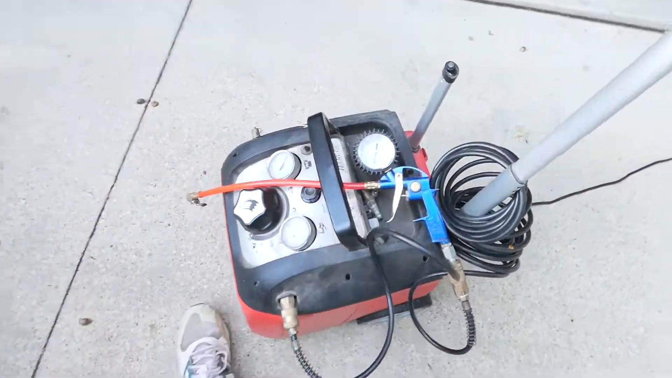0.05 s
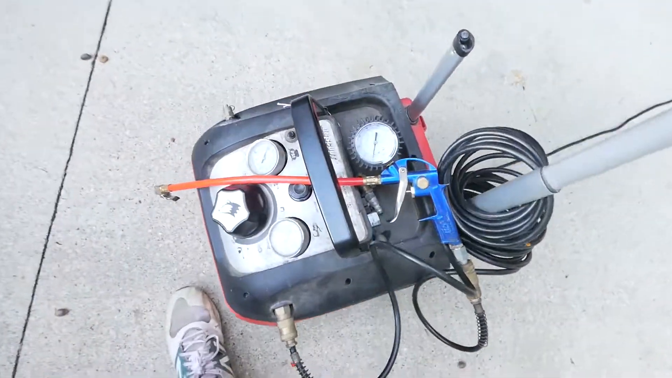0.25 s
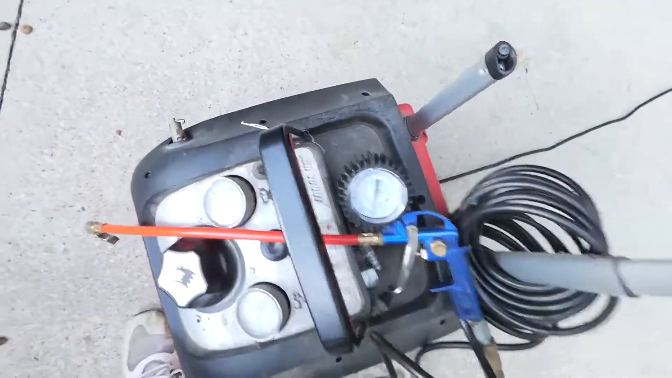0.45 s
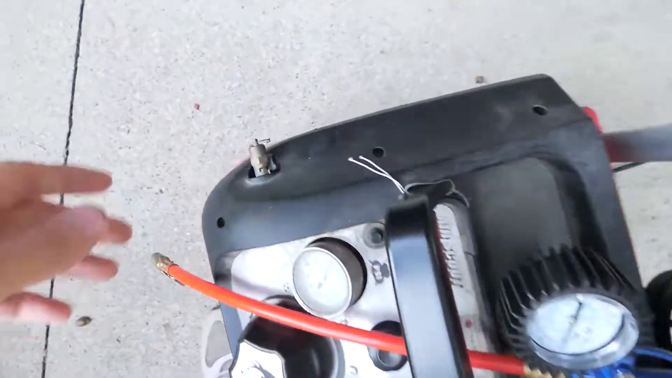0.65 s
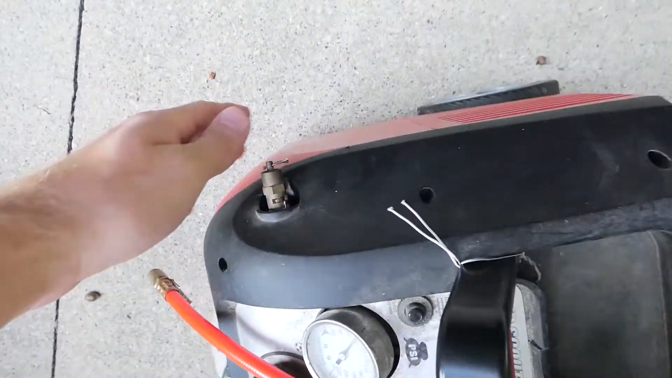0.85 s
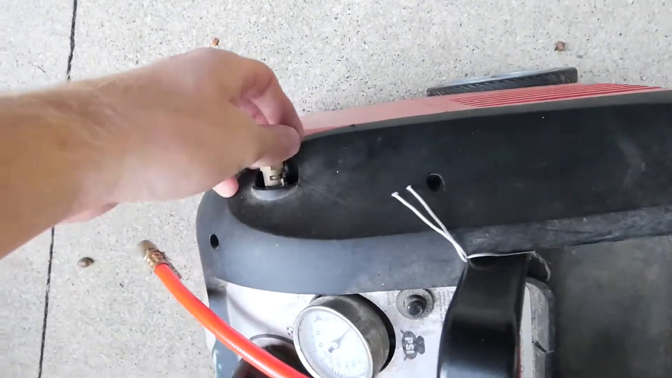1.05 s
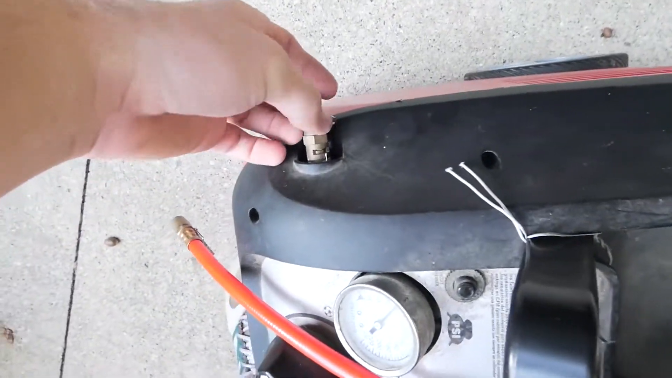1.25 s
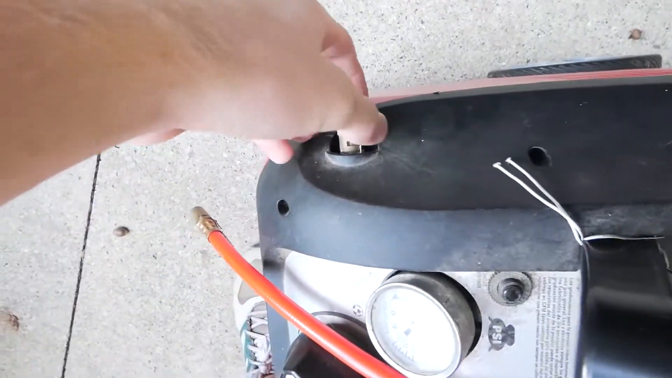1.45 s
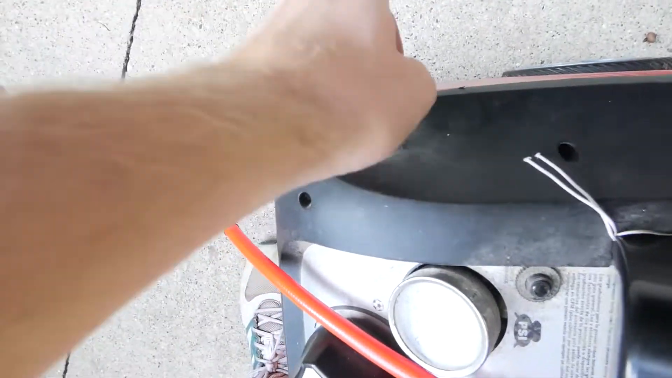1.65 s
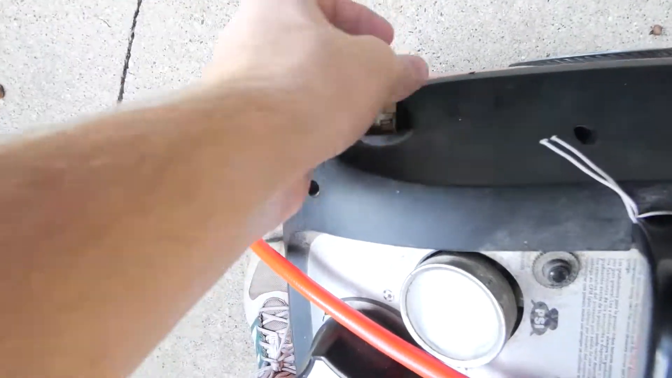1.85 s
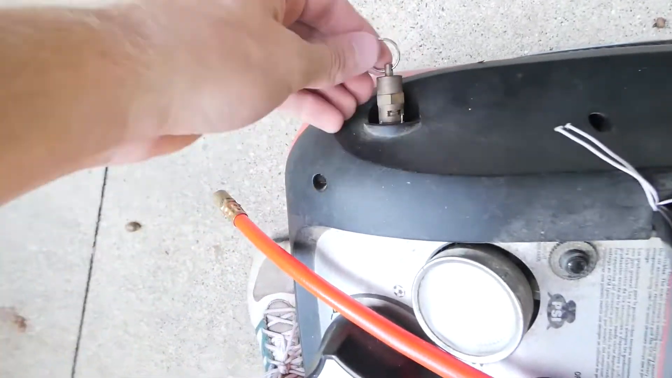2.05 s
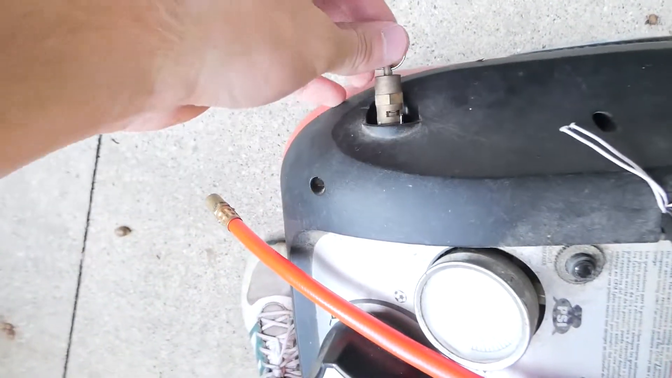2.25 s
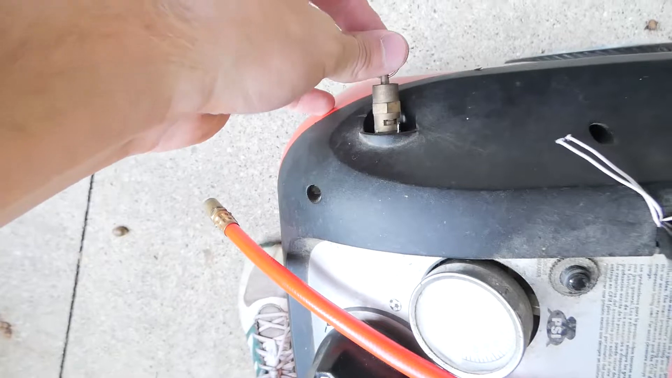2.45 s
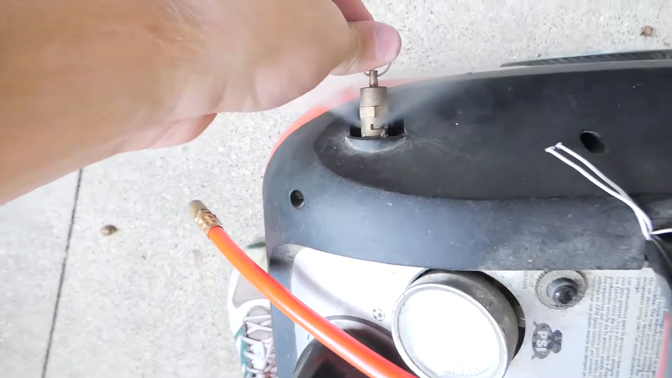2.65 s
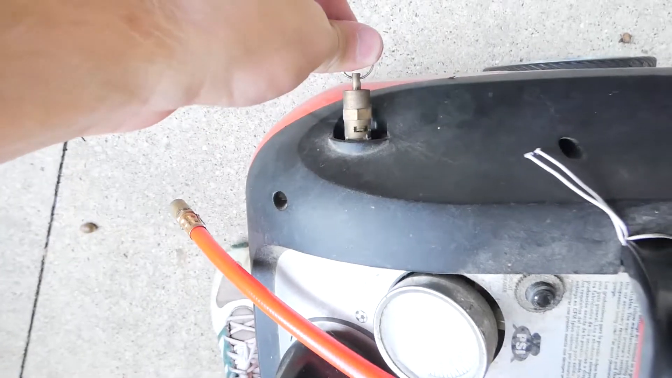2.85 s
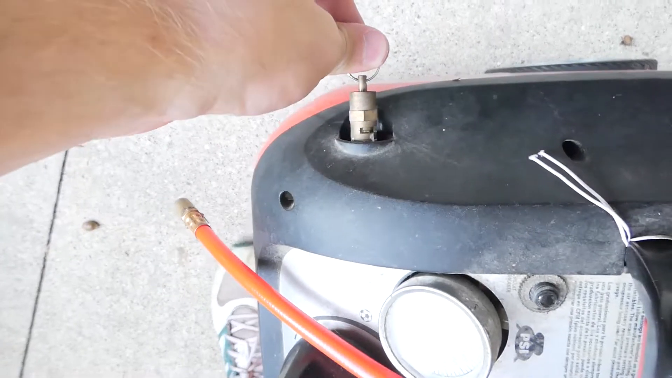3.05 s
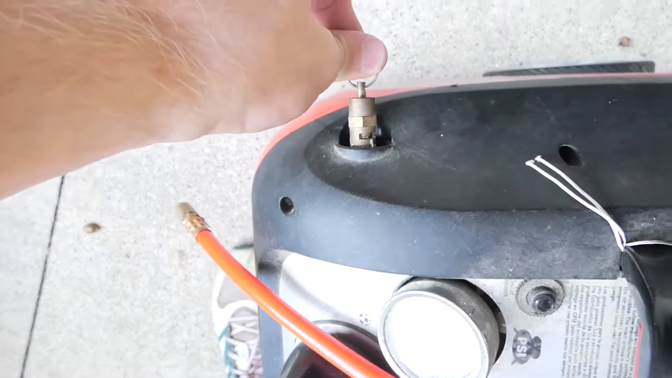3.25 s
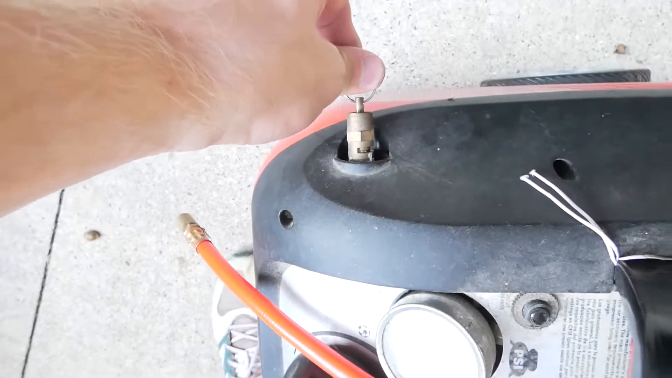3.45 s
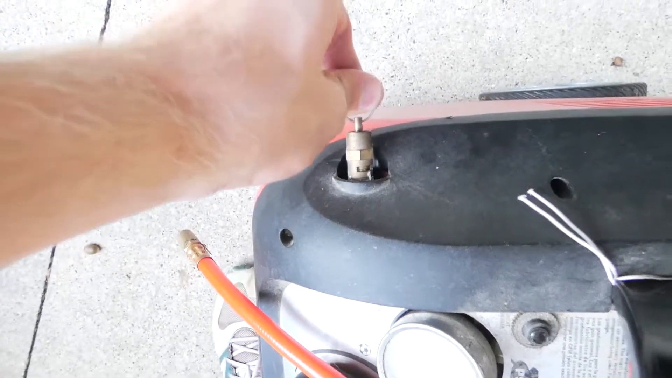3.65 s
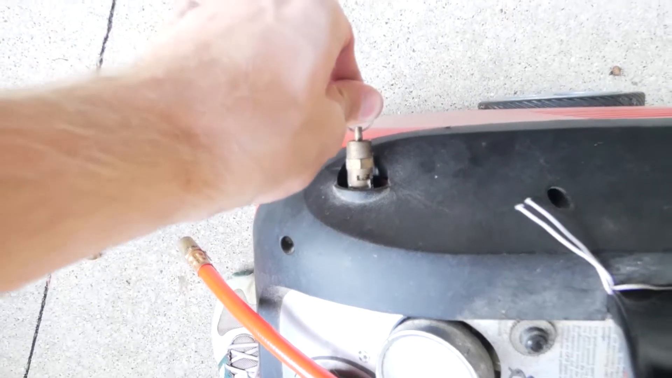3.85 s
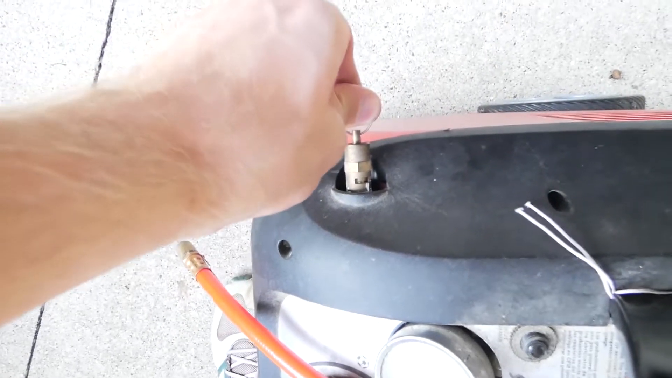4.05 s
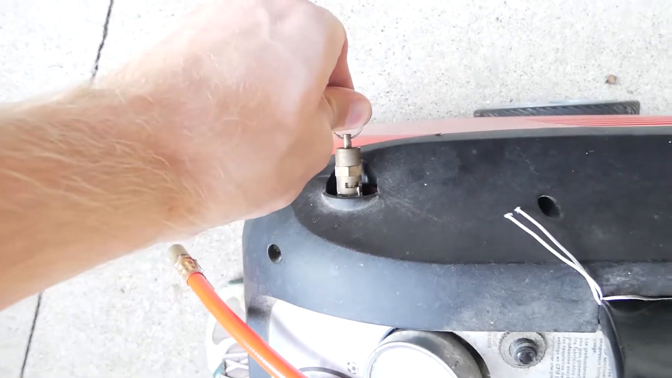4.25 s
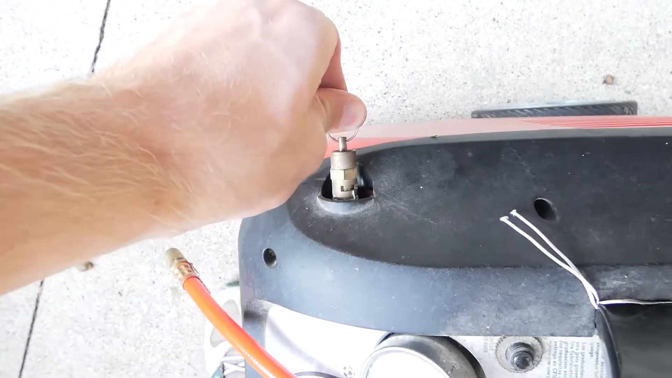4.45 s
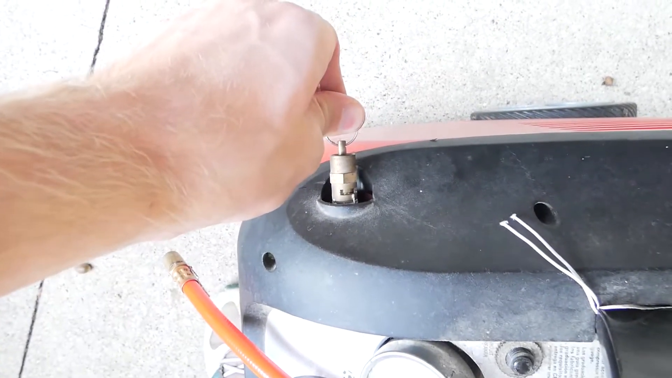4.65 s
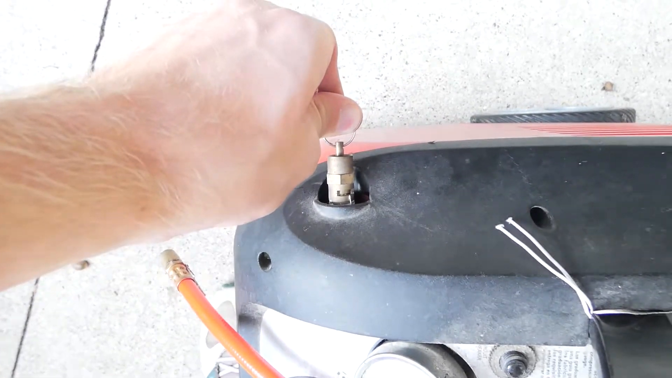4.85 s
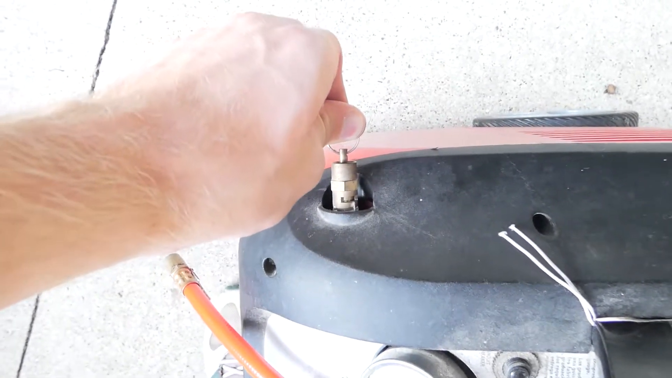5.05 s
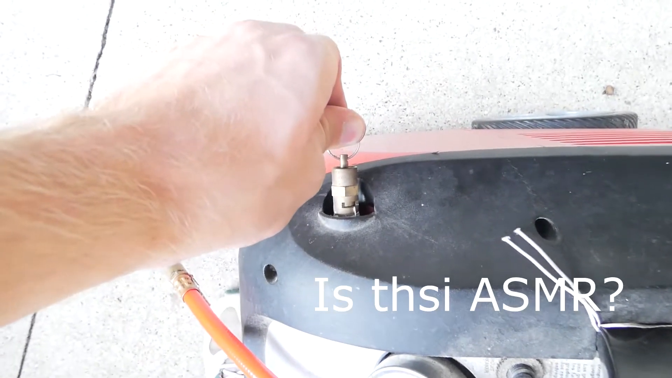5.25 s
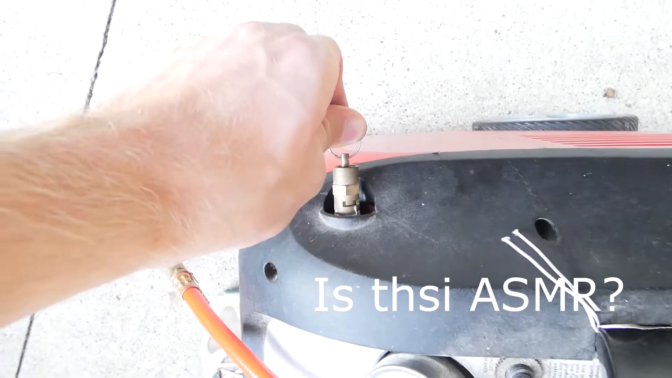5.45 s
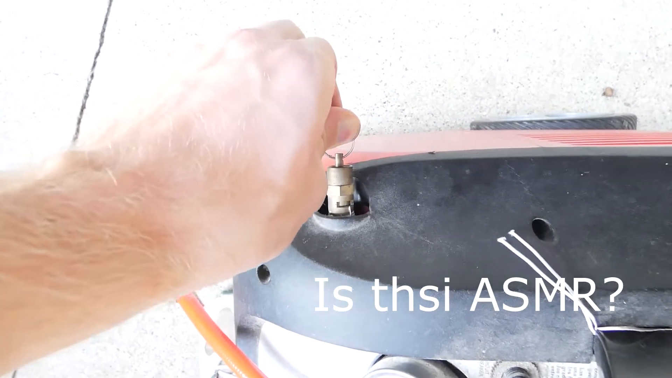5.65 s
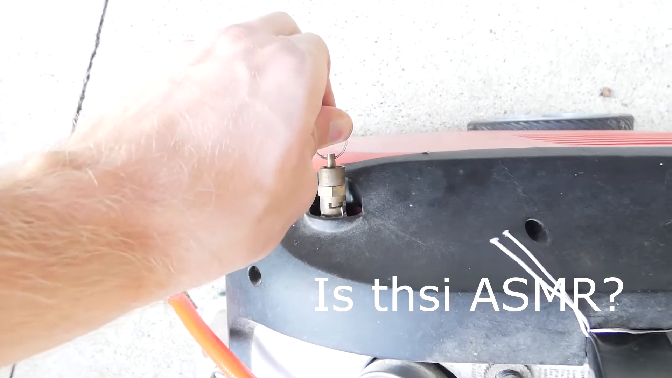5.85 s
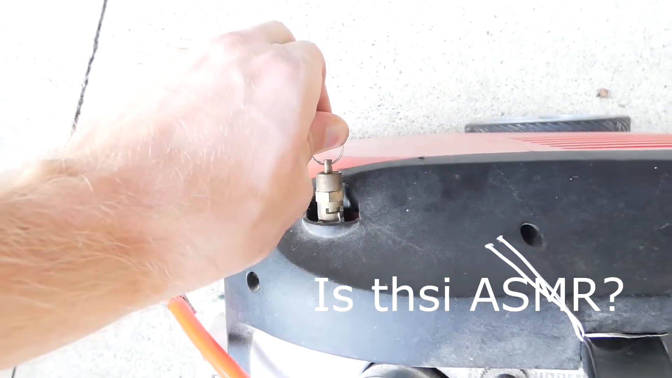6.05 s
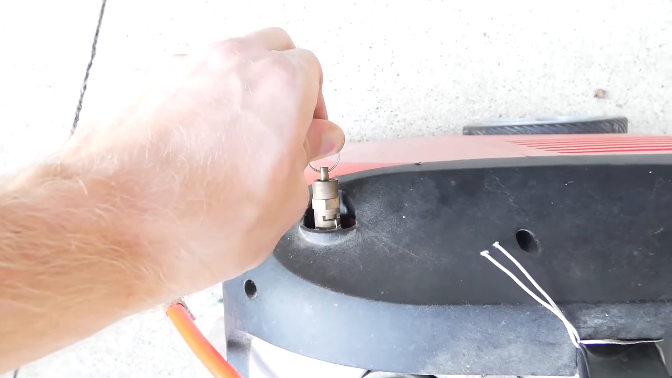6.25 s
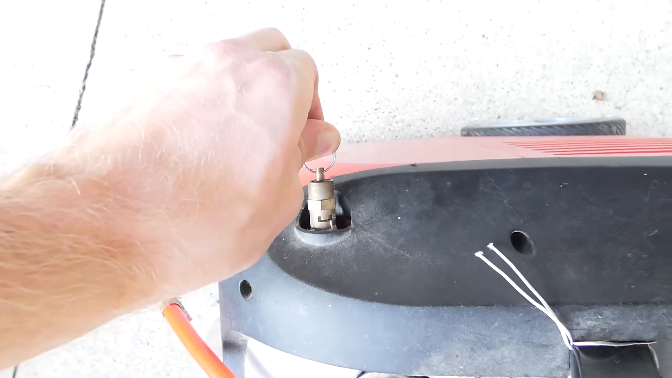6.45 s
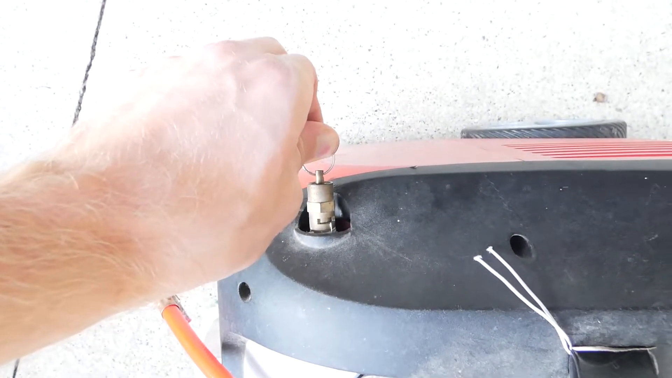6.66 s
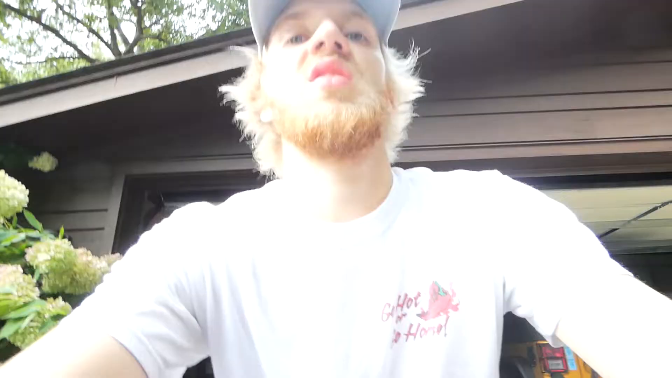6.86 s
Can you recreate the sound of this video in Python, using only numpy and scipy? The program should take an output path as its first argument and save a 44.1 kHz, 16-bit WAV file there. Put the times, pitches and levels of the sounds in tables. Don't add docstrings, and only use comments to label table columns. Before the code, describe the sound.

Hands clatter on a hollow plastic shell outdoors, a valve snaps open, and pressurised air rushes out in a long, gradually weakening hiss.

```python
import sys
import numpy as np
from scipy import signal
from scipy.fft import rfft, irfft
from scipy.io import wavfile

SR = 44100
rng = np.random.default_rng(int(sys.argv[2]) if len(sys.argv) > 2 else 0)


def boost_factor(decibels):
    exponent = np.asarray(decibels, float) / 20
    return 10 ** exponent


def generate_wav(sig):
    pcm = np.round(np.clip(np.atleast_2d(sig).T, -1, 1) * 32767).astype(np.int16)
    wavfile.write(sys.argv[1], SR, pcm)


N = 304731
POP_S = 2.5524

# (time [s], left minus right [dB])
HAND_PAN = [(0, 8), (.25, 12), (.45, 4.6), (1.0, .3), (1.5, -4.2), (2.0, -1.3), (2.5, -3.3)]


def rms_one(x):
    return x / np.sqrt(np.mean(x ** 2) + 1e-20)


def in_time(rows):
    s, *columns = np.transpose(rows)
    return [np.interp(np.arange(N) / SR, s, c) for c in columns]


def at_hz(points):
    hz = np.maximum(np.arange(N // 2 + 1) * SR / N, 1)
    table_hz, value = np.transpose(points)
    return np.interp(np.log(hz), np.log(table_hz), value)


def drift(rate_hz):
    r = np.exp(-80 * np.pi * rate_hz / SR)
    white = rng.standard_normal(N // 40 + 2002)
    slow = signal.lfilter([1], [1, -2 * r, r * r], white)[2000:]
    return np.interp(np.arange(N) / 40, np.arange(len(slow)), rms_one(slow))


def panned(x, pan_db):
    return x * boost_factor(np.array([pan_db / 2, -pan_db / 2]))


def stereo_white(alike, pan):
    mid, side = rfft(rng.standard_normal((2, N)))
    c = np.clip(at_hz(alike), 0, 1)
    return panned(np.sqrt(1 + c) * mid + np.sqrt(1 - c) * side * [[1], [-1]], at_hz(pan))


def coloured(white, colour):
    return rms_one(irfft(white * boost_factor(at_hz(colour)), N))


def resonance(x, hz, width_hz):
    r = np.exp(-np.pi * width_hz / SR)
    zeros = np.array([1, 0, -1]) * (1 - r * r) / 2
    return signal.lfilter(zeros, [1, -2 * r * np.cos(2 * np.pi * hz / SR), r * r], x)


def body(x, modes):
    return sum((-1) ** k * boost_factor(db) * resonance(x, hz, width) for k, (hz, width, db) in enumerate(modes))


def crackle(count, per_s):
    born = rng.random(count) < per_s / SR
    size = rng.exponential(1, count)
    sign = rng.choice([-1, 1], count)
    return rms_one(born * boost_factor(3.0 * np.minimum(size, 4)) * sign)


def scuffs(rows, width):
    out = np.zeros((2, N + SR))
    t = np.arange(-(SR // 10), SR // 5) / SR
    for s, db, hz, length_s in rows:
        slips = crackle(len(t), 5000) + 0.36 * rng.standard_normal((2, len(t)))
        swell = np.exp(-(t / np.where(t < 0, 0.22 * length_s, 0.37 * length_s)) ** 2)
        tone = resonance(resonance(slips, hz, width * hz), hz, width * hz)
        i = round(s * SR)
        out[:, i:i + len(t)] += boost_factor(db) * rms_one(swell * tone) * np.sqrt(np.mean(swell ** 2))
    return panned(out[:, SR // 10:][:, :N], in_time(HAND_PAN)[0])


def yard():
    # (frequency [Hz], density [dB per Hz])
    low_colour = [(30, -14.5), (190, -2.5), (500, -13.5), (1200, -13.5), (1800, -18), (2450, -8.5),
                  (3200, -21), (4100, -24), (4800, -19.5), (6300, -21), (7700, -26), (9000, -22.5),
                  (12500, -30), (15800, -37)]
    high_colour = [(30, -20), (200, -9), (500, -24), (1100, -15.5), (1800, -15), (2550, -9.5), (3300, -21),
                   (4300, -16), (5600, -26), (6700, -12), (7700, -29), (9800, -15.5), (11500, -21),
                   (15800, -26)]
    # (frequency [Hz], left-right likeness [0-1])
    alike = [(60, 0.9), (240, 0.47), (950, 0.61), (3770, 0.97), (15000, 0.48)]
    # (frequency [Hz], left minus right [dB])
    pan = [(60, 21.5), (180, 0.5), (550, 3.5), (1650, -10.5), (4970, -4.5), (15000, 1)]
    # (centre [Hz], width [Hz], level [dB])
    whine_modes = [(2535, 125, 0), (2400, 300, -7)]
    # (frequency [Hz], wavering [Hz], level [dB rms])
    hum_partials = [(203, 1.23, -49.5), (144.7, 2.37, -54.5), (107.4, 2.94, -56.5)]
    # (time [s], share of the way down [0-1])
    stoop = [(.5, 0.55), (1.3, 1.0)]
    # (time [s], share of the turn [0-1])
    swing = [(.45, 0.17), (.8, 1.0)]
    duck_db, duck_s, sag_db_per_s = -17.5, .045, -3.3

    turn = np.clip(in_time(swing)[0], 0, 1)
    down = np.clip(in_time(stoop)[0], 0, 1)
    gain_db = 1.2 + (-.9 - 1.2) * turn
    whine_db = -39.5 + (-46.5 + 39.5) * turn
    whine_pan_db = 1.3 + (-17.3 - 1.3) * turn

    white = stereo_white(alike, pan)
    murmur = (1 - down) * coloured(white, high_colour) + down * coloured(white, low_colour)
    murmur = boost_factor(-37 + gain_db + 1.3 * drift(12)) * murmur

    breath = rng.standard_normal(N) + .5 * rng.standard_normal((2, N))
    higher = [(1.012 * hz, width, db) for hz, width, db in whine_modes]
    whine_high = body(body(breath, higher), higher)
    whine_low = body(body(breath, whine_modes), whine_modes)
    whine = rms_one((1 - down) * whine_high + down * whine_low)
    whine = panned(boost_factor(whine_db + 0.84 * drift(5.7)) * whine, whine_pan_db)

    hum = 0
    for hz, waver_hz, db in hum_partials:
        level = boost_factor(db + 1.6 * drift(3.3))
        phase = 2 * np.pi * np.cumsum(hz + waver_hz * drift(4.9)) / SR
        hum = hum + level * rms_one(np.sin(phase))

    since_s = np.maximum(np.arange(N) / SR - POP_S, 0)
    duck = boost_factor(duck_db * np.minimum(since_s / duck_s, 1) + sag_db_per_s * since_s)
    return (murmur + hum + whine) * duck


def rubbing():
    # (centre [Hz], width [Hz], level [dB])
    shell = [(473, 160, -1), (722, 280, -5), (1100, 410, -7.5)]
    # (frequency [Hz], density [dB per Hz])
    grit = [(1800, -1), (2900, -0.5), (3500, 1.5), (4200, 0), (6000, -5), (9000, -20), (15000, -27)]
    # (middle [s], length [s], hollow level [dB], grit over hollow [dB])
    strokes = [
        (0.323, 0.095, -51.5, 1),
        (.57, .1, -47, 2),
        (.78, .28, -37, -8),
        (0.98, 0.12, -41.5, -5),
        (1.204, 0.19, -45.5, -6),
        (1.452, 0.14, -50, 0),
        (1.604, .13, -39, -12),
        (1.8, .14, -46, -25),
        (2.05, .12, -48, -3),
    ]
    resting_db, fade_db_per_s, resting_grit_db = -48.5, -3.6, .5

    t = np.arange(N) / SR
    hollow_gain = boost_factor(resting_db + fade_db_per_s * t)
    gritty_gain = boost_factor(resting_grit_db + 2 * fade_db_per_s * t) * hollow_gain
    for s, length_s, db, grit_db in strokes:
        press = boost_factor(db) * np.exp(-((t - s) / (0.52 * length_s)) ** 2)
        hollow_gain = hollow_gain + press
        gritty_gain = gritty_gain + boost_factor(grit_db) * press

    slips = crackle(N, 4000)
    apart = rng.standard_normal((2, N))
    rub = 0.45 * slips + .5 * apart + rng.standard_normal(N)
    hollow = rms_one(body(body(rub, shell), shell))
    hollow = panned(hollow_gain * boost_factor(1.3 * drift(40)) * hollow, in_time(HAND_PAN)[0])
    gritty = gritty_gain * boost_factor(1.3 * drift(40)) * coloured(rfft(slips + 0.59 * apart), grit)
    return (t < POP_S) * (hollow + gritty)


def slides():
    # (loudest moment [s], level [dB rms], centre [Hz], length [s])
    finger_slides = [(.003, -28.5, 298, .017), (.536, -19.5, 680, .014), (.554, -32.5, 1100, 0.068),
                     (.591, -38, 500, .016), (.993, -27, 800, .014), (1.015, -39, 1200, .023),
                     (1.033, -27, 1600, .02), (1.141, -32.5, 1100, 0.039), (1.313, -37, 1100, .026),
                     (1.377, -32, 786, 0.016), (1.5, -30, 2100, .03), (1.528, -28.5, 670, 0.031),
                     (1.569, -30, 624, .031), (1.599, -23, 800, .012), (1.747, -35.5, 810, 0.064),
                     (1.784, -37.5, 444, 0.1), (1.914, -41.5, 795, 0.026), (2.046, -33, 850, .04),
                     (2.398, -40, 1270, .03)]
    return scuffs(finger_slides, 0.81)


def knocks():
    # (time [s], peak [dB], shell [Hz], crack over knock [dB], crack [Hz])
    blows = [(0.041, -22.5, 400, -8, 1650), (0.11, -20, 460, -16, 2850), (0.156, -6.5, 490, -36, 3600),
             (0.278, -25, 460, -16, 2960), (0.309, -29, 440, -12, 3070), (0.509, -21, 655, -24, 3230),
             (0.53, -10.5, 1140, -16, 3030), (0.535, -5, 1000, -11.5, 5600), (0.548, -23, 1050, -5, 4320),
             (0.991, -6, 1410, -15, 3400), (1.026, -6.5, 935, -7, 2600), (1.136, -20.5, 580, -2, 3050),
             (1.404, -19, 605, -19, 3470), (1.552, -22, 940, -6, 5200), (1.563, -17.5, 582, -9, 2600),
             (1.564, -26, 2400, -2, 5100), (1.645, -24, 2100, -26, 6100), (2.036, -15.5, 960, -13, 4810),
             (2.094, -20, 1200, -9.5, 4010)]
    # (multiple of shell Hz [ratio], level [dB])
    overtones = [(1.0, 3), (1.3, -7.5), (2.1, -11.5), (.68, -4)]
    ring_cycles, soft_t60_s_per_db = 9, .0007
    echo_samples = 135

    out = np.zeros((2, N))
    t = np.arange(int(.15 * SR)) / SR
    for s, db, hz, crack_db, crack_hz in blows:
        rattle = rng.standard_normal((2, len(t)))
        spread = rng.normal(0, 1, (2, 4))
        t60_s = np.clip(ring_cycles / hz - soft_t60_s_per_db * db, .005, .1)
        blow = (t == 0) + 0.052 * rattle * boost_factor(-60 * t / (1.55 * t60_s))

        modes = [(hz * m * (1 + 0.046 * u), 1.5 * m / t60_s, d + 2.5 * v * (m != 1))
                 for (m, d), u, v in zip(overtones, *spread)]
        ring = body(blow, modes)
        thud = resonance(resonance(blow, 1.07 * hz, 0.86 * hz), 0.98 * hz, 1.5 * hz)
        ring = 0.47 * ring / np.abs(ring).max() + 0.92 * thud / np.abs(thud).max()
        ring = signal.sosfilt(signal.butter(2, 4.5 * hz, fs=SR, output="sos"), ring)

        crack_modes = [(crack_hz, 0.29 * crack_hz, 0),
                       (1.82 * crack_hz, 0.28 * crack_hz, -2),
                       (3.4 * crack_hz, 1.4 * crack_hz, -14)]
        crack = resonance(body(blow, crack_modes), 0.82 * crack_hz, 1.23 * crack_hz)
        crack = boost_factor(crack_db + 11) * crack / np.abs(crack).max()

        i = round((s + 0.00118) * SR)
        out[:, i:i + len(t)] += boost_factor(db) * (ring + crack)
    out[:, echo_samples:] += 0.54 * resonance(out[:, :-echo_samples], 2200, 1400)
    return panned(out, in_time(HAND_PAN)[0])


def brushes():
    # (loudest moment [s], level [dB rms], centre [Hz], length [s])
    sole_brushes = [
        (.135, -42, 4600, .06),
        (.308, -36, 3000, .1),
        (.312, -41.5, 7000, .1),
        (.568, -36, 5100, 0.079),
        (1.14, -35, 5000, .028),
        (1.412, -35, 3000, .027),
        (1.663, -35, 4500, .015),
    ]
    return scuffs(sole_brushes, 0.77)


def squeaks():
    # (loudest moment [s], level [dB rms], centre [Hz], length [s])
    fingertip_squeaks = [(.537, -21, 1150, .011), (2.041, -38, 5000, .014), (.801, -46.5, 3460, 0.53),
                         (1.016, -39, 5300, .008), (1.085, -26, 945, .02), (.474, -37, 1100, .012),
                         (1.317, -30.5, 505, .045), (1.499, -23.5, 1430, .034), (1.503, -41.5, 5970, .061),
                         (2.104, -33, 1190, .04), (2.45, -40, 4200, .015)]
    return scuffs(fingertip_squeaks, 0.32)


def pop():
    t = np.arange(N) / SR - POP_S
    snap = np.exp(-(t / 0.00013) ** 2)
    push = np.exp(-abs((t - .0014) / .00045) ** 1.4)
    return boost_factor(-4) * push - boost_factor(-4.5) * snap


def jet():
    # (frequency [Hz], density [dB per Hz])
    full = [(1470, -16.5), (2500, -12), (3420, -11.5), (4050, -9.5), (4790, -7), (6080, -5), (6820, -6),
            (10200, -1.5), (11600, -5.5), (13500, -9), (15000, -6.5), (15700, -12)]
    half = [(1470, -24.5), (2500, -16.5), (2660, -10), (2870, -13), (3320, -5), (3610, -8), (4480, -8),
            (5760, -4.5), (9410, -2.5), (10600, -1), (14700, -7.5), (15600, -14.5)]
    low = [(1470, -39), (2500, -19.5), (3400, -8), (3960, -10.5), (4340, -2), (4540, -10), (5380, -10),
           (5720, -1.5), (6370, -1), (9340, -2.5), (10100, -4), (14700, -10), (15600, -11)]
    slack = [(1470, -30), (2500, -15), (2910, -14), (4270, -3), (4540, -8.5), (6370, 0), (7650, -8),
             (10600, -3.5), (15600, -15)]
    # (frequency [Hz], density [dB per Hz])
    roar_colour = [(24, -63), (40, -36), (189, -15.5), (228, -17.5), (302, -10.5), (338, -12), (439, -7),
                   (592, -5.5), (687, -0.5), (829, -7), (927, 2), (1180, -4), (1250, -3), (2550, -3),
                   (3500, -16), (4550, -52), (7700, -120)]
    # (frequency [Hz], left-right likeness [0-1])
    alike = [(60, 0.04), (180, 0.063), (550, 0.51), (1650, 0.72), (4970, 0.87), (15000, 0.88)]
    # (frequency [Hz], left minus right [dB])
    pan = [(60, -17), (180, -0.5), (550, 0), (1650, -2.5), (4970, -0.5), (15000, 0.5)]
    # (time [s], hiss level [dB], colour stage [0-3])
    tank = [
        (2.61, -18.7, .01),
        (3.05, -21.3, .1),
        (3.65, -27.8, 0.57),
        (4.7, -27, 1.1),
        (5.5, -27.2, 1.7),
        (6.1, -26.8, 2.0),
        (6.64, -26.8, 2.5),
        (6.67, -30.2, 3.0),
        (6.91, -32, 3.0),
    ]
    burst_db, burst_s, dip_db, dip_s = 10, .003, -3.5, .015
    roar_full_db, roar_low_db, roar_stages = -21, -11.3, 1.2
    leak_s = .0085

    since_s = np.arange(N) / SR - POP_S
    after_s = np.maximum(since_s, 0)
    hiss_db, stage = in_time(tank)
    stage = np.clip(stage, 0, 3)
    white = stereo_white(alike, pan)

    hiss_db = hiss_db + burst_db * np.exp(-after_s / burst_s) + dip_db * np.exp(-after_s / dip_s)
    hiss = sum(np.clip(1 - abs(stage - k), 0, 1) * coloured(white, colour)
               for k, colour in enumerate([full, half, low, slack]))
    roar_db = roar_full_db + (roar_low_db - roar_full_db) * np.tanh((stage / roar_stages) ** 1.5)
    roar = boost_factor(roar_db + 0.48 * drift(15)) * coloured(white, roar_colour)
    opening = boost_factor(np.clip(25 * since_s / leak_s, -200, 0))
    return boost_factor(hiss_db + .55 * drift(14)) * opening * (hiss + roar * opening)


def scene():
    handling = rubbing() + slides() + knocks() + brushes() + squeaks()
    return yard() + handling + pop() + jet()


def low_pass(x):
    return signal.sosfilt(signal.butter(12, 16610, fs=SR, output="sos"), x)


def record(dry):
    thin = signal.sosfilt(signal.butter(2, 110, "high", fs=SR, output="sos"), dry)
    thin = thin - .5 * resonance(thin, 4230, 380)
    thin = signal.sosfilt(signal.ellip(12, .5, 70, 15710, fs=SR, output="sos"), thin)
    return low_pass(np.clip(thin, -1, 1))


dry = scene()
out = record(dry)
generate_wav(out)
```